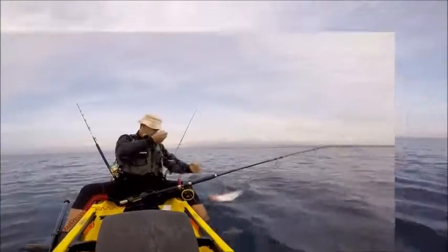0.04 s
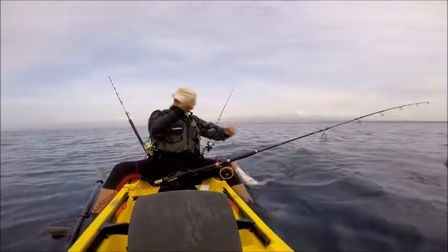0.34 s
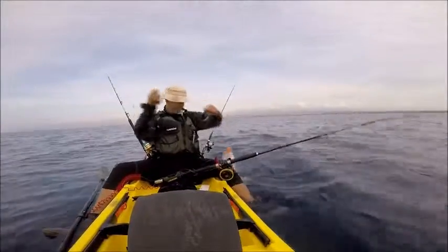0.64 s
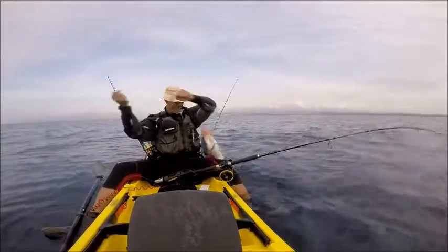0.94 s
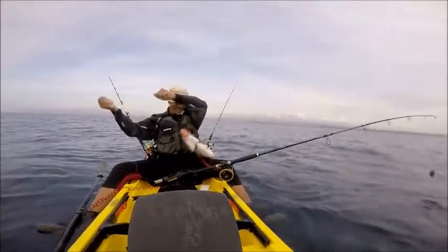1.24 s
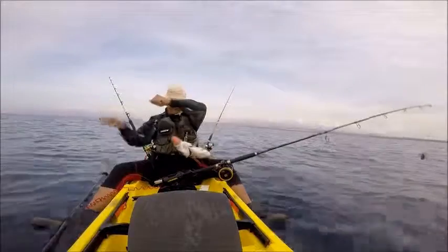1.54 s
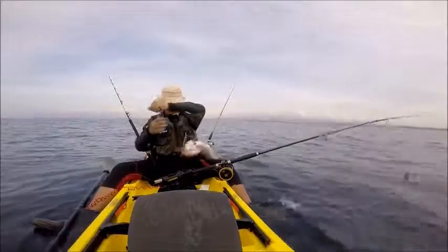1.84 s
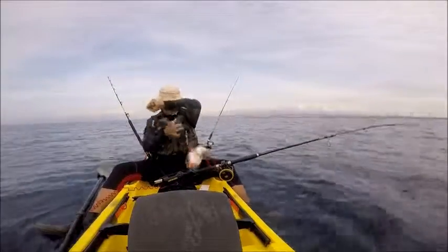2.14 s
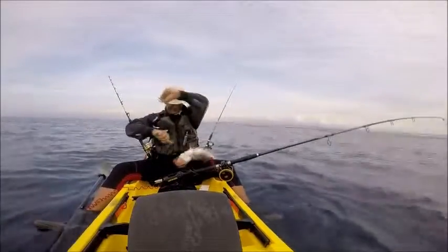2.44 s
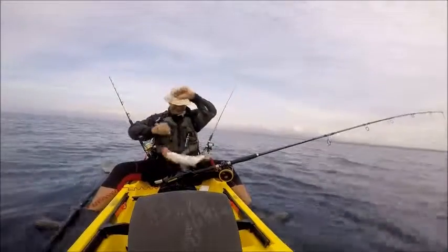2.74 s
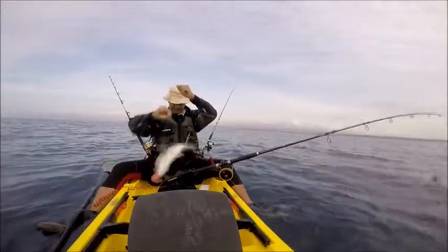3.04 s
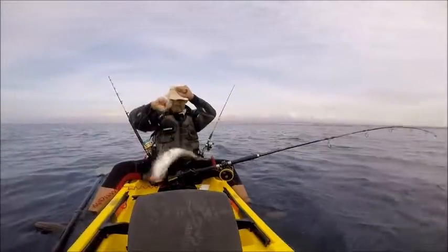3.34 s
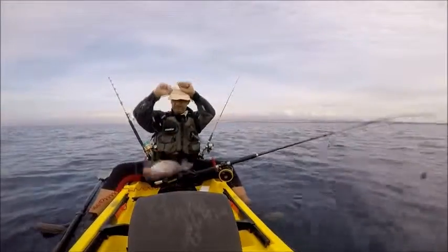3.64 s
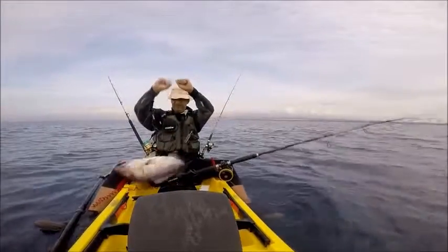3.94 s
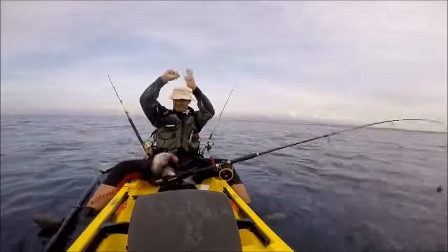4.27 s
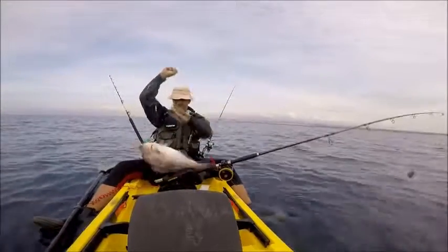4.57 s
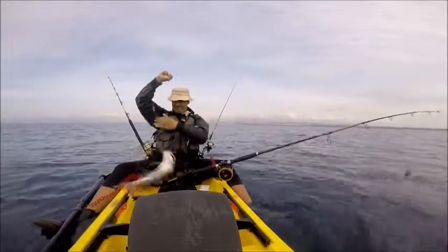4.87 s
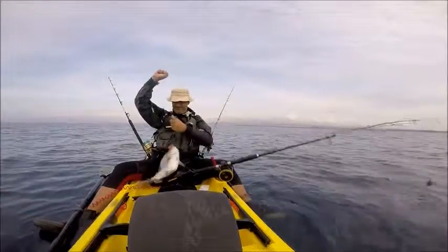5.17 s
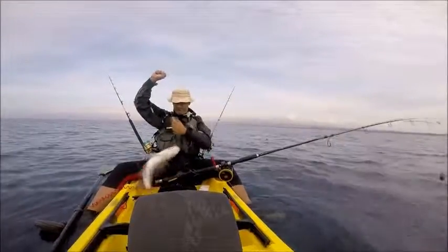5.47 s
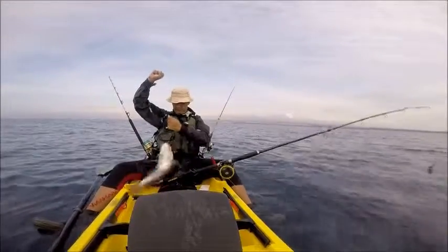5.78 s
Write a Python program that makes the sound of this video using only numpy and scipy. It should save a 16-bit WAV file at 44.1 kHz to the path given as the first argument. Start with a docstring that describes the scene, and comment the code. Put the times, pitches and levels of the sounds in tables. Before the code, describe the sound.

A fish thrashes on a plastic kayak, with hollow thumps, wet slaps and gear knocks over wind rumble and small water plops.

```python
"""A freshly landed fish thrashes in an angler's lap on a plastic kayak, out at sea.
The microphone is in a camera fixed to the bow, so most of the sound reaches it through the boat.
The fish thumps the hollow hull and scrubs over wet, squeaking clothing; its tail slaps and the
fishing gear clicks and raps on the deck. Close by, small waves plop against the side.
Wind and rocking shake the camera with a deep rumble; open water hisses faintly behind it all."""
import sys
import numpy as np
from scipy import signal
from scipy.fft import rfft, irfft
from scipy.io import wavfile
from scipy.ndimage import uniform_filter1d

SR = 44100
rng = np.random.default_rng(int(sys.argv[2]) if len(sys.argv) > 2 else 0)


def unload_audio(sound):
    """Save the sound as a 16-bit wav file, at the path given as the first command line argument."""
    columns = np.transpose(np.atleast_2d(sound))
    # keep every value between -1 and 1, then stretch to whole-number steps
    steps = np.round(np.clip(columns, -1, 1) * 32767)
    wavfile.write(sys.argv[1], SR, steps.astype(np.int16))


N = 265041
TIME = np.arange(N) / SR


def amp(db):
    """Decibels to gain."""
    return 10 ** (np.asarray(db) / 20)


def unit_rms(x):
    """Scales to rms 1."""
    return x / np.sqrt(np.mean(x ** 2) + 1e-20)


def unit_burst(x):
    """Scales so that the loudest 4 ms have rms 1."""
    return x / np.sqrt(uniform_filter1d(x ** 2, 176).max() + 1e-20)


def coloured(x, spectrum):
    """Filters x by rows of frequency_hz, level_db, joined on a log-frequency axis; rms 1."""
    hz, db = np.transpose(spectrum)
    bins_hz = np.fft.rfftfreq(len(x), 1 / SR)
    gain = amp(np.interp(np.log(bins_hz + 1), np.log(hz + 1), db))
    return unit_rms(irfft(rfft(x) * gain, len(x)))


def noise(spectrum, samples):
    """Random noise with the given spectrum, at rms 1."""
    return coloured(rng.standard_normal(samples), spectrum)


def add(mix, start_s, sound):
    """Mixes a sound in at start_s."""
    part = mix[max(round(start_s * SR), 0):][:len(sound)]
    part += sound[:len(part)]


def level_curve(points):
    """Joins rows of time_s, level_db over the whole scene."""
    return np.interp(TIME, *np.transpose(points))


def swell(t, rise_s):
    """A soft start that takes about rise_s."""
    return 1 - np.exp(-(t / rise_s) ** 2)


def decay(t, t60_s):
    """A fade that loses 60 dB every t60_s."""
    return amp(-60 * t / t60_s)


def ring(modes, t, detune):
    """Dying sines, one row a mode; each place of impact weights and loads them differently."""
    hz, db, t60_s = np.transpose(modes)[:, :, None]
    weight_db, shift, phase = rng.standard_normal((3, len(hz), 1))
    cycles = hz * (1 + detune * shift) * t + phase
    return amp(db + weight_db) * decay(t, t60_s) * np.sin(2 * np.pi * cycles)


def grains(per_s, spread_db):
    """Random tiny impacts of unequal size."""
    size = amp(spread_db * np.minimum(rng.exponential(1, N), 4))
    return unit_rms(size * rng.standard_normal(N) * (rng.random(N) < per_s / SR))


def throb(spectrum, smooth_samples):
    """Low narrow-band shaking whose strength stays fairly even."""
    shaking = noise(spectrum, N)
    power = uniform_filter1d(abs(signal.hilbert(shaking)) ** 2, smooth_samples)
    return unit_rms(shaking / np.sqrt(power + 0.3))


# Open water all around the kayak: frequency_hz, level_db
SEA_SPECTRUM = [(88, -17.5), (150, 12.5), (213, -15.5), (320, -8), (389, -20), (672, -7.5), (1010, -17),
                (1250, -10), (1880, -9), (2160, -15), (2620, -12), (3380, -14.5), (7080, -18.5),
                (14300, -26.5), (15700, -42.5)]


def sea(level_db=-64.5):
    """The faint, even hiss of open water, farthest from the microphone."""
    return amp(level_db) * noise(SEA_SPECTRUM, N)


# The boat lurching under the camera as the fish throws its weight: start_s, level_db
LURCHES = [(0.96, -29), (1.09, -21), (2.125, -16), (2.23, -20), (2.5, -21), (3.053, -5), (3.45, -11.5),
           (3.67, -13.5), (3.922, -11), (4.18, -10.5), (4.34, -12.5), (4.66, -15.5), (4.829, -9.5),
           (5.098, -14.5), (5.69, -16)]


def lurching(rise_s=0.018, hold_s=0.034, t60_s=0.58):
    """Gain of the deep thuds: each swells, holds briefly and dies; overlapping ones add in power."""
    power, t = np.zeros(N), np.arange(SR) / SR
    shape = swell(t, rise_s) * decay(np.maximum(t - hold_s, 0), t60_s)
    for start_s, db in LURCHES:
        add(power, start_s, (amp(db) * shape) ** 2)
    return np.sqrt(power)


# How hard the fish struggles, as heard through the hull: time_s, level_db
EFFORT = [(0.0, -63), (0.48, -71.5), (0.85, -67), (1.17, -58), (1.75, -69.5), (2.39, -55.5), (2.57, -67),
          (2.86, -60), (3.24, -58.5), (3.59, -50), (4.01, -53.5), (4.14, -49.5), (4.71, -50.5),
          (4.86, -49.5), (4.98, -45), (5.25, -55), (5.46, -53.5), (6.0, -50)]


def struggle(share, busy_db=-50):
    """Gain that follows a share of the fish's effort in dB; 1 at busy_db."""
    return amp(share * (level_curve(EFFORT) - busy_db))


# Wind and swell, right on the camera: time_s, level_db
WIND_LEVEL = [(0.0, -48), (0.33, -49), (0.72, -52), (1.14, -42), (1.49, -45), (1.69, -49.5), (2.32, -34.5),
              (2.97, -42.5), (3.26, -30), (3.98, -28), (4.13, -19.5), (4.26, -20), (5.5, -29), (6.0, -23)]
# The shaken camera's rumble and the hull's drone beneath it: frequency_hz, level_db
RUMBLE_SPECTRUM = [(8, -49), (18, -11.5), (26.5, -1.5), (31, -9), (45, -16), (60, -24), (100, -55),
                   (300, -99)]
DRONE_SPECTRUM = [(35, -32.5), (62, -34), (82, 5.5), (96, 1), (115, -1), (145, -20.5), (195, -23),
                  (260, -33), (400, -67), (1000, -100)]


def wind_and_rocking(wind_db=4, effort_drone_db=-28, lurch_drone_db=-14):
    """Wind and the lurching boat shake the camera; the hull drones with every movement."""
    lurch = lurching()
    wind = amp(wind_db + level_curve(WIND_LEVEL))
    rumble = np.hypot(wind, lurch) * throb(RUMBLE_SPECTRUM, smooth_samples=3000)
    drone_gain = np.hypot(amp(effort_drone_db) * struggle(share=1.39), amp(lurch_drone_db) * lurch)
    return rumble + drone_gain * throb(DRONE_SPECTRUM, smooth_samples=2000)


# Small waves at the waterline, just below the microphone: start_s, level_db, pitch_hz, rise_s
PLOPS = [(0.112, -52.5, 960, 0.0041), (0.232, -52.5, 952, 0.011), (0.258, -52.5, 1055, 0.0057),
         (0.456, -51, 1012, 0.022), (0.934, -40.5, 958, 0.0066), (1.194, -46, 893, 0.013),
         (1.309, -47.5, 980, 0.018), (1.364, -40, 967, 0.0093), (1.396, -47.5, 950, 0.01),
         (2.496, -33, 990, 0.0062), (2.524, -41, 950, 0.023), (2.552, -37, 1110, 0.0024),
         (2.878, -46.5, 1007, 0.0035), (2.956, -49, 720, 0.0047), (3.778, -33.5, 897, 0.0044),
         (5.836, -31, 1034, 0.0026)]


def wave_plops(gain_db=-2, pocket_t60_s=0.082, glide=0.21, pat_db=-3, pat_t60_s=0.092):
    """A trapped pocket of air rings and rises in pitch while the water pats the shell."""
    out, t = np.zeros(N), np.arange(SR // 5) / SR
    pat_spectrum = [(200, 2), (650, -3), (1000, 7), (1600, -9), (2200, -21), (5000, -44)]
    for start_s, db, hz, rise_s in PLOPS:
        pocket = np.sin(2 * np.pi * hz * t * (1 + glide * t)) * decay(t, pocket_t60_s)
        pat = amp(pat_db) * noise(pat_spectrum, len(t)) * decay(t, pat_t60_s)
        add(out, start_s, amp(db + gain_db) * unit_burst((pocket + pat) * swell(t, rise_s)))
    return out


# The angler's sleeves and vest, back at the seat: time_s, level_db
CLOTH_LEVEL = [(0.0, -69.5), (1.55, -68), (2.0, -65), (2.67, -66), (3.02, -66.5), (3.16, -61.5),
               (3.29, -68), (3.41, -72.5), (4.09, -64), (4.9, -67.5), (5.15, -76), (5.55, -71), (5.83, -64),
               (6.0, -66)]
# Rubbed cloth, heard through the air: frequency_hz, level_db
CLOTH_SPECTRUM = [(700, -25), (2000, -3.5), (2800, 7), (3500, -3.5), (4600, 3), (7200, -3.5), (8500, -7),
                  (13000, -6), (16000, -26)]
# Resonances of the hard fishing gear on board: pitch_hz, level_db, t60_s
GEAR_MODES = [(1790, -1, 0.044), (2260, -24, 0.013), (2640, -4, 0.032), (2880, 1, 0.023),
              (4326, -3.5, 0.037), (4410, 14.5, 0.017), (4940, 4.5, 0.021), (5085, -3, 0.03),
              (5320, 4.5, 0.022), (5640, 4, 0.022), (6500, -29, 0.027), (6985, 13.5, 0.011),
              (7810, -1, 0.02), (8050, -21.5, .025), (10300, -10, 0.01), (12400, -10, 0.0092)]


def clothing_rustle(gain_db=-2, tackle_db=-7):
    """Small slips of cloth rustle and jostle the tackle."""
    t = np.arange(SR // 6) / SR
    jostles = grains(per_s=150, spread_db=2)
    fibres = coloured(grains(per_s=2500, spread_db=2.5), CLOTH_SPECTRUM)
    gear = ring(GEAR_MODES, t, detune=0.0023).sum(0)
    tackle = unit_rms(signal.oaconvolve(jostles, gear)[:N])
    return amp(gain_db + level_curve(CLOTH_LEVEL)) * unit_rms(fibres + amp(tackle_db) * tackle)


# Loose gear on the deck, behind the bow: start_s, level_db, relative_ping_db
RAPS = [(3.105, -21, -12), (3.153, -26, -30), (3.603, -29.5, -22), (4.098, -36, -14), (4.298, -43.5, -12),
        (4.583, -39.5, -24), (4.824, -36.5, -29), (4.988, -29.5, -30), (5.016, -28.5, -42),
        (5.052, -32.5, -41), (5.09, -35, -17), (5.205, -40.5, -36), (5.235, -50, -32), (5.279, -37.5, -34),
        (5.344, -42.5, -35)]
# The deck's dry knock: frequency_hz, level_db
RAP_SPECTRUM = [(300, 13), (700, 5.5), (1100, 7.5), (1400, 3), (1800, -9), (2200, -21), (3400, -47),
                (6000, -66), (16000, -87)]


def gear_raps(gain_db=1, knock_t60_s=0.051, ping_t60_s=0.014):
    """Loose gear bounces on the deck with short, dry knocks; some carry a brief, bright ping."""
    out, t = np.zeros(N), np.arange(SR // 10) / SR
    ping_spectrum = [(1940, -40), (2590, 0), (2850, 0), (3500, -40)]
    for start_s, db, ping_db in RAPS:
        knock = unit_burst(noise(RAP_SPECTRUM, len(t)) * decay(t, knock_t60_s) * swell(t, 0.00088))
        ping = unit_burst(noise(ping_spectrum, len(t)) * decay(t, ping_t60_s) * swell(t, 0.0051))
        add(out, start_s, amp(db + gain_db) * (knock + amp(ping_db) * ping))
    return out


# Wet cloth and line rubbing, faint at the bow: start_s, length_s, start_hz, end_hz, level_db
SQUEAKS = [(1.935, 0.03, 3170, 2420, -50.5), (1.96, 0.029, 4720, 4260, -54.5),
           (1.971, .014, 2580, 3320, -58), (2.356, 0.017, 6950, 6950, -65), (2.718, 0.025, 2100, 1960, -61),
           (2.74, 0.049, 1740, 1650, -60.5)]


def wet_squeaks(jitter=0.041):
    """Cloth and line stick and slip at an unsteady, gliding rate."""
    out = np.zeros(N)
    for start_s, length_s, start_hz, end_hz, db in SQUEAKS:
        stroke = signal.windows.tukey(round(length_s * SR), 0.5)
        wobble = unit_rms(uniform_filter1d(rng.standard_normal(len(stroke)), size=40))
        hz = np.linspace(start_hz, end_hz, len(stroke)) * (1 + jitter * wobble)
        add(out, start_s, amp(db) * stroke * np.sin(2 * np.pi * np.cumsum(hz) / SR))
    return out


# The fish sliding over the wet lap: middle_s, length_s, level_db, below_3khz_db
SWIPES = [(0.283, 0.06, -61, -1), (1.758, .12, -62, 11), (1.946, 0.1, -57.5, -2), (2.22, 0.12, -63.5, -3),
          (2.652, 0.088, -64, -6), (2.986, 0.1, -54.5, 8.5), (3.064, 0.049, -53.5, -1),
          (3.134, 0.099, -62, 7), (3.2, 0.072, -51, -2), (3.273, .072, -48, 2), (3.572, 0.11, -58, -7),
          (3.705, .11, -55.5, 3), (3.93, .096, -51.5, -5), (4.065, 0.099, -57.5, -1),
          (4.197, 0.04, -57.5, -16), (4.291, 0.067, -57.5, 1), (4.365, 0.03, -57, -8),
          (4.638, 0.059, -54, -2), (4.889, 0.078, -38, 2.5), (5.67, 0.064, -51, -0.5),
          (5.837, 0.071, -57, -2)]


def scale_swipes(snap_t60_s=0.054, fine_db=-4, top_db=-9):
    """Scales catch and let go of the cloth: a short swell of crackle."""
    out, t = np.zeros(N), np.arange(SR // 80) / SR
    snap = rng.standard_normal(len(t)) * decay(t, snap_t60_s)
    catches = unit_rms(signal.oaconvolve(grains(per_s=170, spread_db=3), snap)[:N])
    crackle = catches + amp(fine_db) * grains(per_s=900, spread_db=4)
    for middle_s, length_s, db, low_db in SWIPES:
        stroke = np.hanning(round(length_s * SR))
        slips = crackle[round(middle_s * SR):][:len(stroke)]
        rustle = coloured(slips, CLOTH_SPECTRUM)
        wet = coloured(rustle, [(3000, low_db), (4200, 0.0073), (7500, 0), (11000, top_db)])
        add(out, middle_s - length_s / 2, amp(db) * wet * stroke)
    return out


# Resonances of the plastic hull that carries the camera: pitch_hz, level_db, t60_s
HULL_MODES = [(82.82, 0, 0.35), (100.24, -12.5, 0.47), (111, -2.5, 0.28), (201, -4, 0.14), (242, -7, 0.12),
              (278, -9, 0.25), (312, -1, 0.13), (358.8, -3.5, 0.15), (459.3, -6, 0.13), (554.4, -11.5, 0.1),
              (631, -11, 0.23), (757.5, -10, 0.2), (786.4, -9.5, 0.08), (908, -6, 0.042),
              (923.5, -15, 0.27), (985, 6.5, 0.028), (1036.5, -2.5, 0.054), (1153, -7, 0.087),
              (1367, -11.5, 0.065), (1526, -25.5, 0.16), (1633, -20.5, .085), (1820, -13.5, 0.019)]
# The shell's dense, weak resonances, heard as noise: frequency_hz, level_db
SHELL_SPECTRUM = [(100, -55), (200, -4.5), (450, 1.5), (600, -1.5), (1000, -2.5), (1300, -12), (1800, -19),
                  (2200, -31), (3000, -34.5), (5000, -47.5), (16000, -87.5)]
BOOM_BELOW_HZ, DECK_ABOVE_HZ = 170, 590


def hull_scrub(level_db=-51, shell_db=-3):
    """Small slips of the fish rattle the hull's shell, louder the harder it struggles."""
    t = np.arange(SR // 6) / SR
    upper_modes = [mode for mode in HULL_MODES if mode[0] > BOOM_BELOW_HZ]
    ringing = ring(upper_modes, t, detune=0.001).sum(0)
    slips = unit_rms(signal.oaconvolve(grains(per_s=500, spread_db=2), ringing)[:N])
    scuffs = coloured(grains(per_s=1200, spread_db=2), SHELL_SPECTRUM)
    return amp(level_db) * struggle(share=0.84) * unit_rms(slips + amp(shell_db) * scuffs)


# Tail slaps and gear clicks around the seat: start_s, level_db, low_tilt_db, top_tilt_db
SLAPS = [(0.2696, -54.5, -2, 14), (0.371, -57, -11, -24), (0.5093, -48, 4, -30), (0.729, -59.5, -7, -25.5),
         (0.877, -55, -4, -23), (0.931, -50.5, -3, -25), (2.0968, -49, -5, -5), (2.1535, -41, -2, -6),
         (2.2844, -51, -3, -25), (2.4778, -48.5, -5, 0), (3.1057, -29, 10, -1), (3.192, -51, -3, -13),
         (3.2084, -51, -10, 3), (3.241, -48, -12, -23), (3.263, -45, -16, -4), (3.2945, -41.5, -10, -17),
         (3.3095, -24.5, -3, 5.5), (3.566, -37.5, -11.5, -7), (3.632, -49, -28, 8), (3.927, -44, -8, -10),
         (4.0888, -43, -21, -4), (4.266, -47.5, -3, -2), (4.3776, -38, -10, -0.5), (4.6575, -35, -14, 9),
         (4.671, -45, -15, 4), (4.782, -42.5, 1.5, -2), (4.823, -51.5, -16, 1), (4.864, -38, -13, -3),
         (4.8834, -22, -3.5, -1.5), (4.887, -25, -21, -2), (4.97, -33, -8.5, -5),
         (5.4253, -39.5, -2.5, 4.5), (5.6141, -46.5, -1, -45), (5.8284, -46.5, -6, -35),
         (5.8717, -14.5, -11.5, 0.5)]
# The crack of a wet slap at close range: frequency_hz, level_db
SLAP_SPECTRUM = [(300, -43), (1500, -3.5), (2900, 0), (3500, -3), (4600, 1.5), (7200, -4), (8800, -13.5),
                 (12500, -21), (15000, -24), (17000, -47)]


def slaps_and_clicks(gain_db=-2, crack_db=1, scatter_db=-26, scatter_t60_s=0.062, ticks_per_s=2):
    """A short wet crack sets the hard gear ringing; the deck scatters a faint after-sound."""
    out, t = np.zeros(N), np.arange(SR // 8) / SR
    tackle_ticks = [(start_s, -59, -14, -16) for start_s in TIME[rng.random(N) < ticks_per_s / SR]]
    for start_s, db, low_db, top_db in SLAPS + tackle_ticks:
        crack_t60_s = 0.023 * 0.5 ** ((db + 45) / 39)  # harder hits snap shorter
        fade = decay(t, crack_t60_s) + amp(scatter_db) * decay(t, scatter_t60_s)
        crack = amp(crack_db) * noise(SLAP_SPECTRUM, len(t)) * fade
        gear = unit_burst(ring(GEAR_MODES, t, detune=0.00063).sum(0))
        hit = np.pad((gear + crack) * swell(t, 0.0022), (SR // 100, 0))  # 10 ms lead for the filter
        hardness = [(3100, low_db + 7), (4000, 0), (7500, 0), (10500, top_db + 9)]
        add(out, start_s - 0.01, amp(db + gain_db) * unit_burst(coloured(hit, hardness)))
    return out


# The fish's blows, carried through the boat to the bow: start_s, deck_db, wall_db, boom_db, contact_s
THUMPS = [(0.114, -73, -51.5, -41, 0.014), (0.896, -53.5, -50, -33.5, 0.02),
          (1.088, -36, -43, -24, 0.00054), (1.867, -42.5, -40, -33.5, 0.02), (1.902, -43, -36, -23, 0.007),
          (2.034, -53.5, -48.5, -38, 0.0069), (2.132, -23, -49, -31.5, 0.0039),
          (2.139, -16.5, -35, -2.5, 0.0024), (2.158, -27.5, -50, -23, 0.0029),
          (2.237, -39.5, -38, -17.5, 0.00094), (2.292, -53, -44, -30, 0.0027),
          (2.419, -39.5, -43, -31, 0.0052), (3.056, -25, -30.5, -10, .005),
          (3.066, -25, -24.5, -31, 0.0012), (3.074, -15, -21, -21, 0.0018), (3.106, -25, -31, -30, 0.0008),
          (3.15, -26, -43, -32, 0.002), (3.162, -23, -25, -9.5, 0.0047), (3.187, -28, -32, -22, 0.0063),
          (3.263, -37, -34, -27, 0.0081), (3.31, -40, -43, -25, .002), (3.44, -30, -22, -15, 0.0059),
          (3.45, -28.5, -24, -9, 0.0076), (3.506, -35, -43, -10.5, 0.0057), (3.57, -36.5, -33, -12, 0.0062),
          (3.613, -35, -33.5, -9, 0.0076), (3.698, -48, -41.5, -31, 0.0021), (3.926, -34, -33, -21, 0.0081),
          (3.956, -41.5, -36, -26.5, .004), (4.159, -70, -38, -16, 0.0018),
          (4.205, -35, -35.5, -17, 0.0021), (4.269, -39, -46, -36, 0.0046), (4.362, -37.5, -31, -37, 0.013),
          (4.442, -40, -39, -27, 0.0057), (4.63, -41.5, -35, -37, 0.01), (4.662, -37, -36, -14, 0.004),
          (4.718, -42, -39, -21, 0.0054), (4.787, -36.5, -41, -22, .001),
          (4.865, -24.5, -23.5, -20, 0.0036), (4.888, -6.5, -14.5, -23, 0.0018),
          (4.895, -17, -12.5, -5, .003), (4.917, -28, -14.5, -17, 0.0011), (5.43, -30.5, -35, -21, 0.0037),
          (5.439, -29, -27, -10, .003), (5.617, -39, -34.5, -27, 0.0085), (5.652, -34, -57, -19.5, 0.018),
          (5.696, -39.5, -36, -13.5, 0.00065), (5.875, -21, -32, -25, 0.00041),
          (5.883, -23, -28, -30, 0.0011)]


def fish_thumps(boom_rise_s=0.011, shell_db=-8, shell_t60_s=0.25, direct_db=4, direct_t60_s=0.038):
    """The stiff deck knocks, the walls ring, and the hollow hull booms alike wherever it is struck."""
    out, t = np.zeros(N), np.arange(SR * 3 // 5) / SR
    hull = np.array(HULL_MODES)
    low, high = hull[:, 0] < BOOM_BELOW_HZ, hull[:, 0] > DECK_ABOVE_HZ
    first_wave = 1 + amp(direct_db) * decay(t, direct_t60_s)  # strong before it spreads through the hull
    hollow = sum(amp(db) * decay(t, t60_s) * np.sin(2 * np.pi * hz * t) for hz, db, t60_s in hull[low])
    boom = unit_burst(hollow * swell(t, boom_rise_s))
    for start_s, deck_db, wall_db, boom_db, contact_s in THUMPS:
        modes = ring(hull, t, detune=0.002)
        shell = amp(shell_db) * noise(SHELL_SPECTRUM, len(t)) * decay(t, shell_t60_s)
        deck = unit_burst(modes[high].sum(0)) + shell
        knock = unit_burst(deck * first_wave * swell(t, contact_s))
        walls = unit_burst(modes[~low & ~high].sum(0) * swell(t, 1.06 * contact_s))
        thump = amp(deck_db - 1) * knock + amp(wall_db - 2) * walls + amp(boom_db - 2) * boom
        add(out, start_s, thump)
    return out


def scene():
    """Everything reaches one microphone on the bow, mostly through the boat."""
    events = fish_thumps() + wave_plops() + gear_raps()
    events += slaps_and_clicks() + scale_swipes() + wet_squeaks()
    background = wind_and_rocking() + hull_scrub() + clothing_rustle() + sea()
    return (events + background)[None]


def record(dry, ceiling=0.92, cutoff_hz=15600):
    """The camera rounds off the loudest peaks, then cuts the highest treble."""
    rounded = dry / (1 + (dry / ceiling) ** 6) ** (1 / 6)
    lowpass = signal.firwin(511, cutoff_hz, window=("kaiser", 9), fs=SR)
    return signal.oaconvolve(rounded, lowpass[None], "same")


dry = scene()
out = record(dry)
unload_audio(out)
```